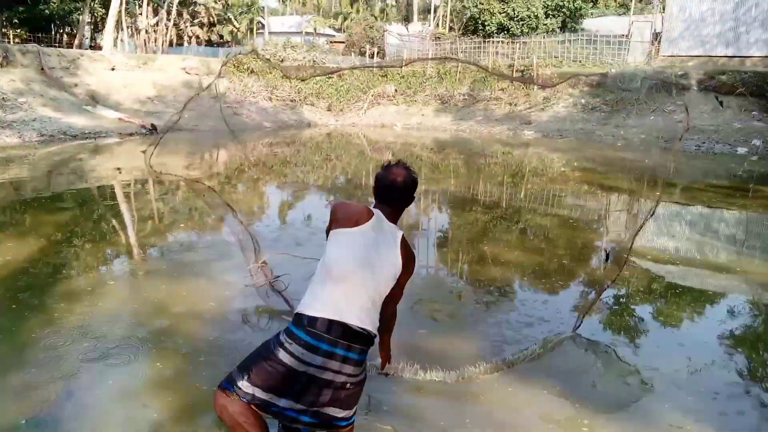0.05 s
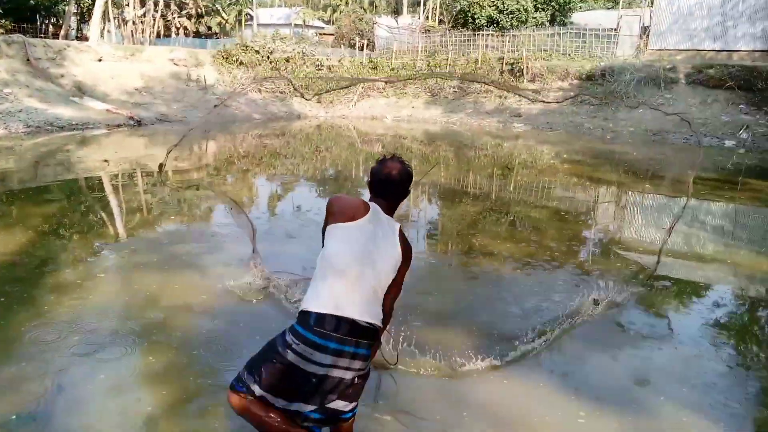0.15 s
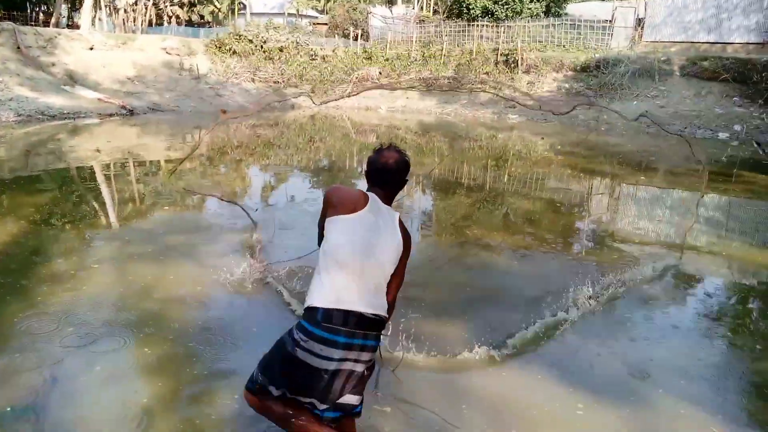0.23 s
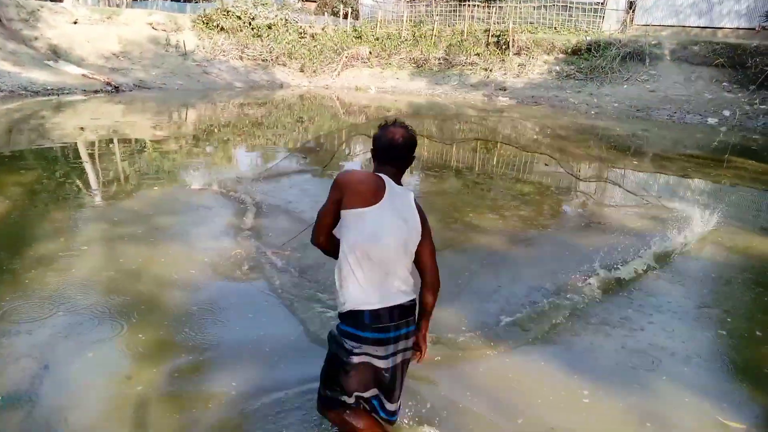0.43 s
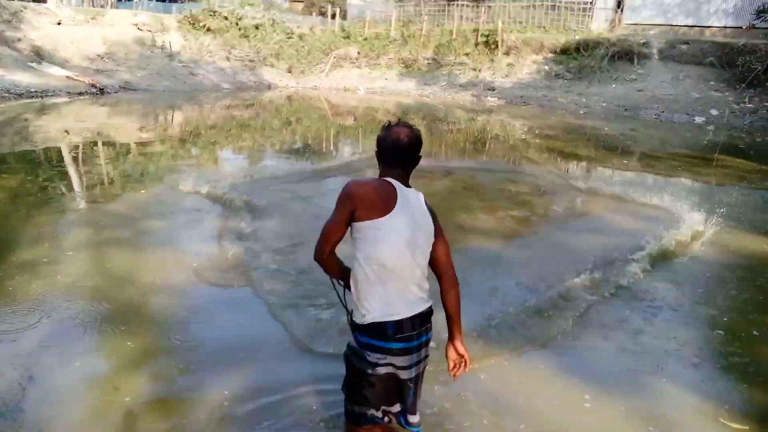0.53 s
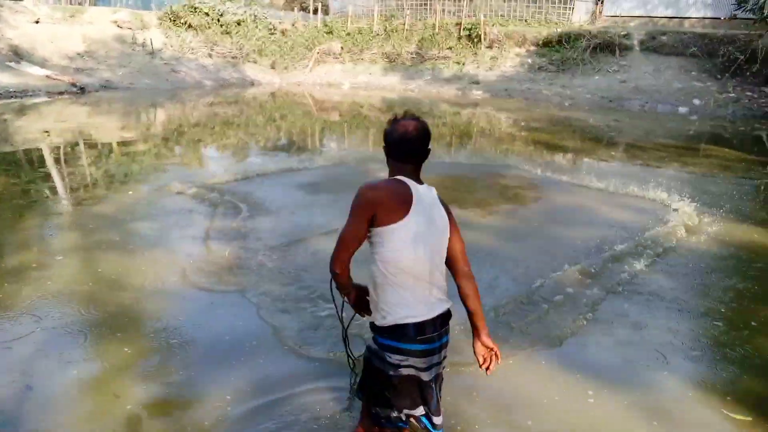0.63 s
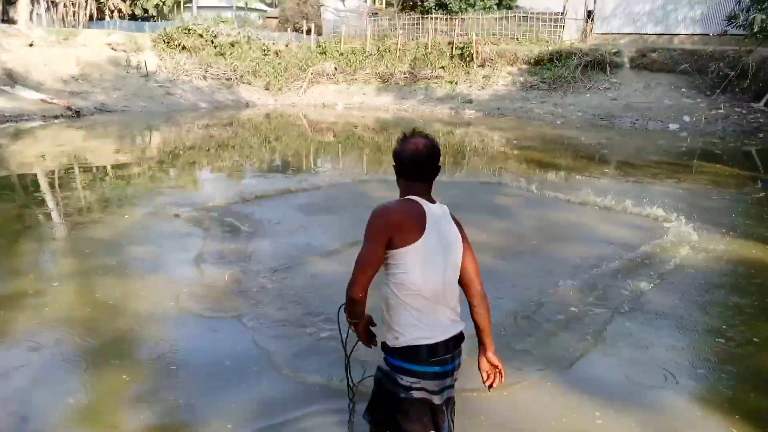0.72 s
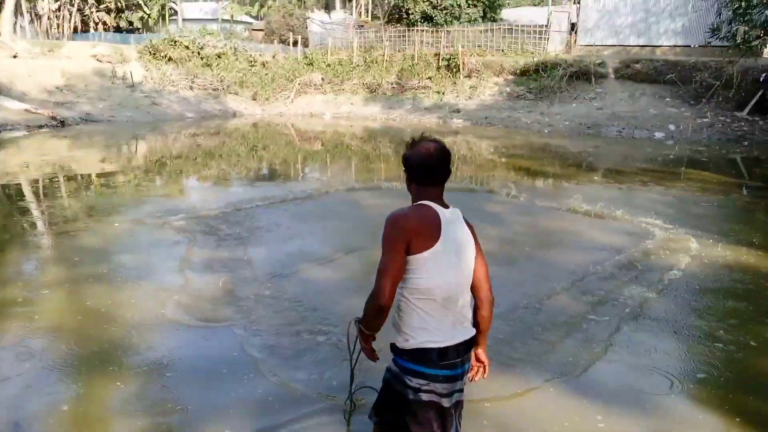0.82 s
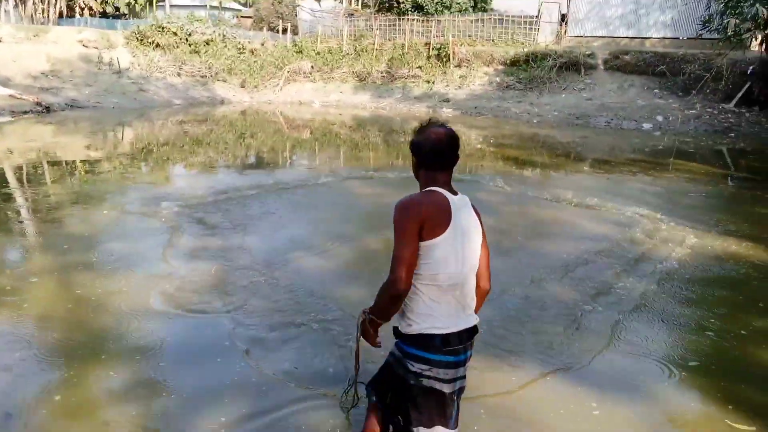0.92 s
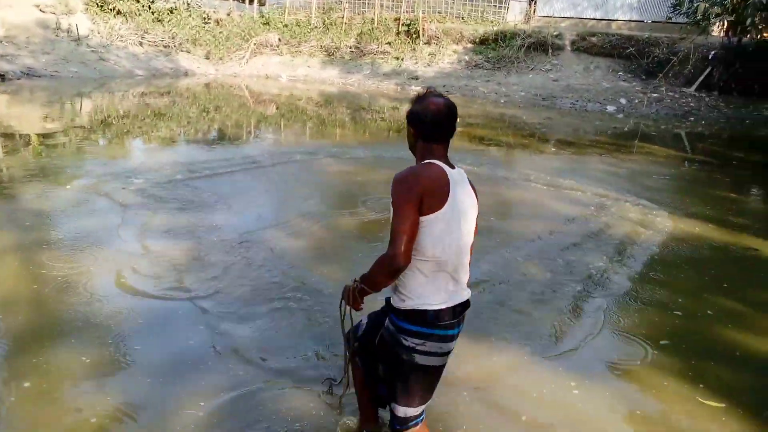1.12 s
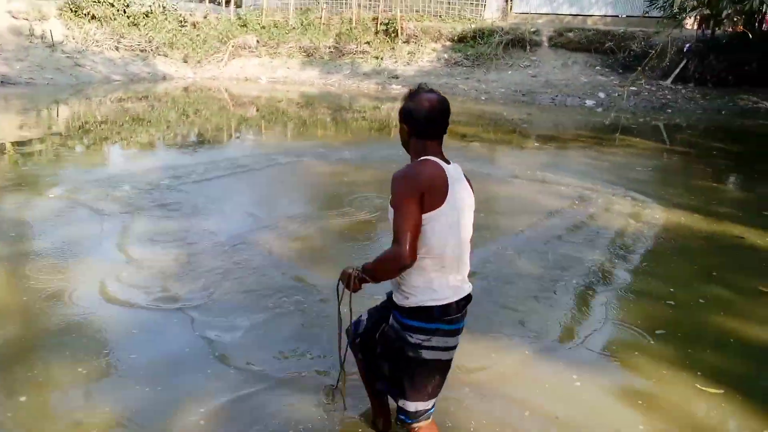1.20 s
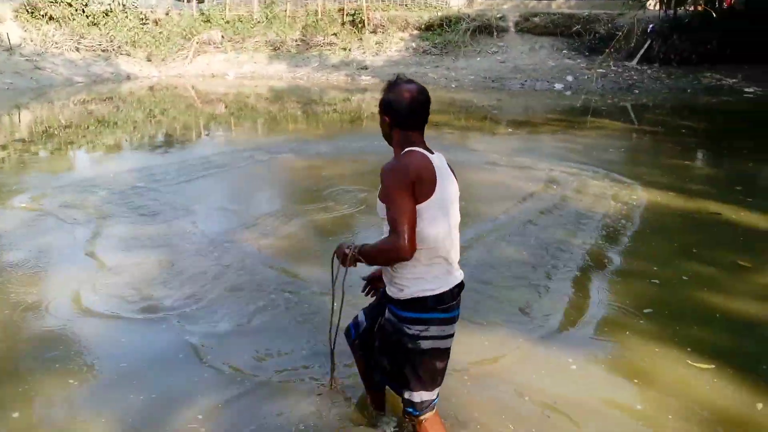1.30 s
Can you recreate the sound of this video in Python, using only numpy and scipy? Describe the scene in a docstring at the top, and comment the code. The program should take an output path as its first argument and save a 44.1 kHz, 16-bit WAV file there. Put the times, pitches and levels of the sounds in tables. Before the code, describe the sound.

A cast net splashes onto a pond. It hisses open briefly at about 0.1 seconds, then from 0.2 its weights patter in with quick plops, gulps and spray, loudest around 0.5 to 0.7. Small bubbles and drops fade by about 1 second, and a wet line swishes softly near 1.15. Underneath are a faint, distant chugging engine and light puffs of wind on the microphone.

```python
"""A pond, where a cast net hisses open and its ring of sinkers lands, one stretch of rim after another.
Each sinker traps air that rings as a short plop; larger pockets gulp and the mesh throws up spray.
Bubbles and drops settle, the wet hand line swishes once, and the banks return a faint echo.
Far off an engine, perhaps a pump, chugs; a little wind touches the microphone."""
import sys
import numpy as np
from scipy import signal
from scipy.fft import rfft, irfft, next_fast_len
from scipy.io import wavfile
from scipy.ndimage import map_coordinates

SR = 44100
rng = np.random.default_rng(int(sys.argv[2]) if len(sys.argv) > 2 else 0)


def inscribe(sig):
    """Save sig as 16-bit PCM at rate SR to the path in sys.argv[1].

    A 1-D sig is mono; a 2-D sig holds one channel per row.
    Samples are clipped to [-1, 1] before scaling.
    """
    pcm = np.round(np.clip(np.atleast_2d(sig).T, -1, 1) * 32767)
    wavfile.write(sys.argv[1], SR, pcm.astype(np.int16))


N = 59535
TOUCHDOWN_S = 0.151

# Each row: start in seconds, relative peak in dB, pitch in Hz, swell in ms.
SINKER_PLOPS = [(.2025, -24, 738, 4.15), (.2525, -29.5, 930, 1.7), (0.2564, -30.5, 440, 3.4),
                (.2945, -28, 708, 3.1), (.297, -34.5, 286, 10), (.3095, -27.5, 964, 2),
                (.320, -31, 348, 4.8), (.333, -31, 910, 1.06), (.416, -30.5, 427, 7.4),
                (.442, -34, 790, 1.6), (.455, -37.5, 265, 13.5), (.4868, -18, 770, 2.1),
                (.4925, -29, 1003, 3.6), (.5022, -23.5, 817, 1.67), (.5205, -26, 864, 1.3),
                (0.5285, -35, 540, 1.3), (.5405, -26.5, 710, 2.2), (.5625, -22, 717, 1.94),
                (.5845, -29, 880, 1.9), (.5865, -20, 379, 4.13), (.6165, -24, 227.6, 3.17),
                (.6188, -17, 800, 0.99), (.6305, -26, 685, 2.8), (.642, -33, 770, 1.9),
                (.659, -35, 740, 4.3), (.6872, -24, 698, 2.14), (.707, -30, 710, 2.7), (.7445, -29, 747, 3),
                (.764, -35.5, 800, 2.7)]
RISING_BUBBLES = [(.766, -39, 1920, 4), (.774, -43.5, 899, 10.4), (.812, -39.5, 810, 2.9),
                  (.820, -45, 427, 7.4), (.840, -47.5, 636, 6), (.859, -47, 702, 6.7),
                  (.8845, -39, 852, 4.1), (.897, -41.5, 805, 5.1), (.903, -44, 930, 4.4),
                  (.924, -51.5, 423, 6.9), (0.974, -50, 1046, 17.4), (1.0056, -41, 1025, 4.7),
                  (1.018, -52.5, 1047, 7.3)]
def plops():
    """Air pockets ring under single sinkers; bubbles from the sinking net chirp upwards."""
    sinkers = amp(-4.5) * pockets(SINKER_PLOPS, rise=0.0083)
    bubbles = amp(-2.5) * pockets(RISING_BUBBLES, rise=0.036)
    return filtered(sinkers + bubbles, lambda hz: hz ** 8 / (hz ** 8 + 203 ** 8))  # high-pass


# Each row: time in seconds, level in dB.
PATTER_LEVEL = [(.17, -75), (.2, -45.5), (.24, -46.5), (.262, -43.5), (.345, -43.5), (.39, -44.5),
                (.44, -41), (.475, -50), (.5, -36.5), (.55, -46), (.64, -39.5), (.71, -45), (.76, -51),
                (.85, -57), (.905, -59.5), (1.0, -67.5), (1.35, -76.5)]
GULP_LEVEL = [(.19, -91), (.275, -48), (.375, -50), (.42, -44), (.48, -49), (.56, -43.5), (.71, -46.5),
              (.76, -57.5), (.84, -72), (1.35, -77.5)]
# Each row: frequency in Hz, gain in dB.
PATTER_SPECTRUM = [(200, -57), (450, -7.5), (560, -5.5), (720, 2), (980, -1), (1110, -10.5), (1280, -3),
                   (1700, -28), (3000, -58)]
GULP_SPECTRUM = [(100, -28), (180, -41), (260, -9.5), (370, 1.5), (440, 5.5), (530, 0), (900, -16)]
def rim():
    """The many other sinkers patter in and their cavities gulp shut."""
    patter = swarm(count=1000, hz=843.6, octaves=0.498, cycles=0.92, scatter_db=1.5, samples=900)
    gulps = swarm(count=260, hz=368, octaves=0.343, cycles=1.92, scatter_db=2, samples=2600)
    return (level(PATTER_LEVEL) * coloured(patter, PATTER_SPECTRUM)
            + level(GULP_LEVEL) * coloured(gulps, GULP_SPECTRUM))


# Each row: time in seconds, level in dB.
SPRAY_LEVEL = [(.19, -66), (.21, -50), (.235, -54.5), (.265, -49), (.34, -47.5), (.39, -50.5), (.5, -48.5),
               (.605, -49), (.627, -44), (.655, -49.5), (.7, -50), (.75, -53.5), (.83, -57.5), (.9, -59.5),
               (.98, -62), (1.1, -71), (1.35, -77)]
# Each row: frequency in Hz, gain in dB.
SPRAY_SPECTRUM = [(400, -45), (900, 2), (1400, 2.5), (2000, -2.5), (2700, -1.5), (3200, -6), (4050, -3),
                  (4800, -9.5), (7200, -11.5), (8300, -18.5), (11000, -19.5), (13500, -28.5),
                  (15500, -20.5)]
def spray():
    """Clumps of droplets and small bubbles from the mesh, duller as they settle."""
    clumps_per_s, settle_s, dulling_db_per_s = 200, 0.63, 46
    drops = swarm(count=4200, hz=4480, octaves=1.178, cycles=0.32, scatter_db=2.5, samples=200)
    bubbles = swarm(count=1000, hz=2809, octaves=0.8, cycles=6.15, scatter_db=1.65, samples=1200)
    clumps = amp(2 * map_coordinates(rng.standard_normal(1000), [clock() * clumps_per_s]))
    fizz = coloured(clumps * (drops + amp(-0.5) * noise()) + amp(-3) * bubbles, SPRAY_SPECTRUM)
    treble_db = -dulling_db_per_s * np.maximum(clock() - settle_s, 0)
    return level(SPRAY_LEVEL) * treble_shelf(fizz, treble_db)


# Each row: start in seconds, relative level in dB, centre in Hz, width in octaves, snap gain in dB.
DROP_SLAPS = [(0.2052, -44.5, 6200, 0.55, -22), (0.2987, -28.5, 3630, 0.14, -32),
              (0.5646, -39, 6500, 0.12, -24), (0.5751, -33, 5170, 0.13, -8),
              (0.616, -25.5, 2700, 0.41, -30), (0.6211, -22.5, 2070, 0.48, -28),
              (.6283, -27, 3730, 0.58, -14), (0.6918, -27, 3450, 0.37, -31), (0.6911, -38, 6700, 0.078, -3),
              (.6412, -45, 6800, 0.11, -30), (1.154, -48, 6540, .12, -40)]
def slaps():
    """Near drops hit the surface: each a brief band of noise with a broad snap above it."""
    attack_s, t60_s, snap_top_hz = 0.00079, 0.011, 9000
    out = np.zeros(N)
    for start_s, db, centre_hz, octaves, snap_db in DROP_SLAPS:
        def response(hz):
            band = (1 + (np.log2((hz + 1) / centre_hz) / (2 * octaves)) ** 2) ** -3
            snap = (hz > centre_hz) * centre_hz / (hz + 1) / (1 + (hz / snap_top_hz) ** 2)
            return band + amp(snap_db) * snap
        t = clock() - start_s
        crack = unit(filtered(noise(), response))
        out += amp(db - 7) * crack * np.clip(t / attack_s, 0, 1) * amp(-60 * np.abs(t) / t60_s)
    return out


# Each row: frequency in Hz, gain in dB.
SHOWER_SPECTRUM = [(1500, -12), (3800, -18), (6500, -20), (15000, -21)]
def shower():
    """A sheet of fine droplets, flung up where the rim lands hardest."""
    drops = swarm(count=3000, hz=5500, octaves=0.7, cycles=1.5, scatter_db=3, samples=300)
    gain = amp(-54) * envelope(start_s=0.607, attack_s=0.013, hold_s=0, t60_s=0.13)
    return gain * coloured(drops, SHOWER_SPECTRUM)


# Each row: start, attack, hold and 60 dB decay time in seconds, level in dB.
MESH_STROKES = [(0.127, 0.016, 0.0053, 0.089, -57), (.150, 0.014, 0.0084, 0.22, -55.5)]
LINE_STROKES = [(1.133, 0.01, 0.014, 0.12, -66), (1.159, 0.011, 0.015, 0.031, -57)]
# Each row: frequency in Hz, gain in dB.
MESH_SPECTRUM = [(800, -27), (1750, -2.5), (2600, -3.5), (3500, -1.5), (4900, -14), (7000, -5.5),
                 (8300, -11.5), (10200, -12), (14000, -32)]
LINE_SPECTRUM = [(2100, -10.5), (2450, -0.5), (2900, -8.5), (3800, -1), (5400, -12), (6050, 6.5),
                 (6600, -17), (7200, -13), (8000, -25), (14000, -35.5)]
def swishes():
    """The mesh hisses open and dulls as it slows; later the wet hand line runs out."""
    dulling_db_per_s = 150
    mesh = treble_shelf(twine(MESH_STROKES, MESH_SPECTRUM), dulling_db_per_s * (TOUCHDOWN_S - clock()))
    return mesh + twine(LINE_STROKES, LINE_SPECTRUM)


def twine(strokes, spectrum):
    """Twine slides over twine and whips through the air: a hiss of many brief whistles."""
    out = np.zeros(N)
    for *timing_s, db in strokes:
        whistles = swarm(count=2500, hz=4639, octaves=0.73, cycles=11.4, scatter_db=0.5, samples=1100)
        out += amp(db) * coloured(whistles + amp(-1) * noise(), spectrum) * envelope(*timing_s)
    return out


def bank_echo(x, t60_s=0.2):
    """A short, diffuse echo from around the pond."""
    tail = noise() * amp(-60 * clock() / t60_s)
    return signal.fftconvolve(x, tail / np.linalg.norm(tail))[:N]


def engine(firings_per_s=14.15, fade_db_per_s=2):
    """A far engine fires evenly, each stroke a low thud of slightly different strength."""
    out = np.zeros(N)
    for start_s in 0.029 + np.arange(20) / firings_per_s:
        db = -57 - fade_db_per_s * start_s + rng.standard_normal()
        out += amp(db) * ring(clock() - start_s, hz=96, swell_s=0.0075, rise=0)
    return out


# Each row: time in seconds, level in dB.
WIND_LEVEL = [(0, -75), (.3, -71), (.42, -59), (.48, -76), (.53, -57), (.58, -76), (.73, -85), (.8, -60.5),
              (.87, -71)]
# Each row: frequency in Hz, gain in dB.
AIR_SPECTRUM = [(25, -21), (50, -2), (90, -10.5), (150, 2), (380, -2.5), (550, -10.5), (900, -2.5),
                (1600, -5.5), (2500, -19), (4200, -14.5), (5200, -22.5), (7200, -25), (8500, -33.5)]
WIND_SPECTRUM = [(20, -25), (40, -26), (62, -4.5), (85, -2), (130, -11.5), (300, -54)]
def air():
    """A steady outdoor hush, with low puffs of wind on the microphone."""
    hush = amp(-69.5) * coloured(noise(), AIR_SPECTRUM)
    return hush + level(WIND_LEVEL) * coloured(noise(), WIND_SPECTRUM)


def ring(t, hz, swell_s, rise):
    """A tone swells and dies; its pitch climbs by the fraction `rise` per swell time."""
    age = np.maximum(t, 0) / swell_s
    return age ** 2 * np.exp(2 * (1 - age)) * np.sin(2 * np.pi * hz * t * (1 + rise * (age / 2 - 1)))


def pockets(rows, rise):
    """One ringing air pocket per row."""
    return sum(amp(db) * ring(clock() - s, hz, ms / 1000, rise) for s, db, hz, ms in rows)


def swarm(count, hz, octaves, cycles, scatter_db, samples):
    """A stream of random rings at rms 1, each swelling for about `cycles` periods."""
    starts = (np.arange(count) + rng.uniform(-1, 2, count)).clip(0) * N / count
    pitch, life, strength = rng.standard_normal((count, 3)).T[:, :, None]
    ring_hz = np.clip(hz * 2 ** (octaves * pitch), 100, 15000)
    swell_s = cycles * np.exp(0.57 * life) / ring_hz
    gains = amp(scatter_db * np.clip(strength, -2, 2))
    waves = gains * ring(np.arange(samples) / SR, ring_hz, swell_s, rise=0.0083)
    positions = starts.astype(int)[:, None] + np.arange(samples)
    return unit(np.bincount(positions.ravel(), waves.ravel(), N)[:N])


def amp(db):
    return 10 ** (np.asarray(db) / 20)


def unit(x):
    return x / np.sqrt(np.mean(x ** 2) + 1e-20)


def clock():
    return np.arange(N) / SR


def noise():
    return rng.standard_normal(N)


def level(points):
    return amp(np.interp(clock(), *np.transpose(points)))


def envelope(start_s, attack_s, hold_s, t60_s):
    t = clock() - start_s
    return np.clip(t / attack_s, 0, 1) * amp(-60 * np.maximum(t - attack_s - hold_s, 0) / t60_s)


def filtered(x, response):
    size = next_fast_len(N + 8192)
    return irfft(rfft(x, size) * response(np.fft.rfftfreq(size, 1 / SR)), size)[:N]


def coloured(x, spectrum):
    """x shaped by (Hz, dB) points, at rms 1."""
    points_hz, db = np.transpose(spectrum)
    return unit(filtered(x, lambda hz: amp(np.interp(np.log(hz + 1), np.log(points_hz), db))))


def treble_shelf(x, gain_db, corner_hz=5500):
    treble = filtered(x, lambda hz: hz ** 8 / (hz ** 8 + corner_hz ** 8))
    return x - treble + treble * amp(gain_db)


def scene():
    """The cast and its echo, over the engine and the air."""
    landing = np.clip((clock() - TOUCHDOWN_S) / 0.061, 0, 1)  # still water until the mesh arrives
    cast = plops() + landing * (rim() + spray()) + slaps() + shower() + swishes()
    return (cast + amp(-14.5) * bank_echo(cast) + engine() + air())[None]


def record(dry):
    """Brick-wall low-pass at 15.6 kHz."""
    return np.array([filtered(x, lambda hz: hz < 15600) for x in dry])


dry = scene()
out = record(dry)
inscribe(out)
```